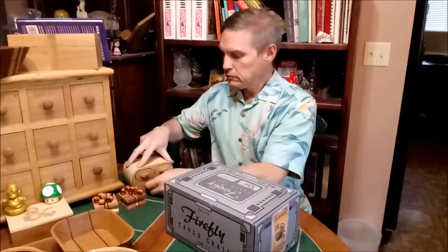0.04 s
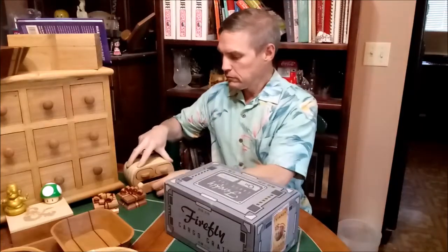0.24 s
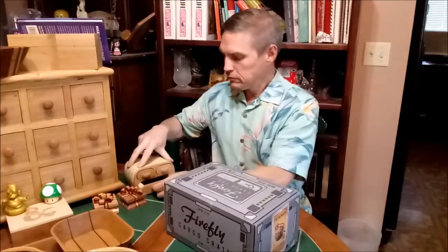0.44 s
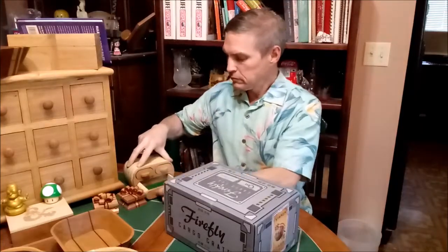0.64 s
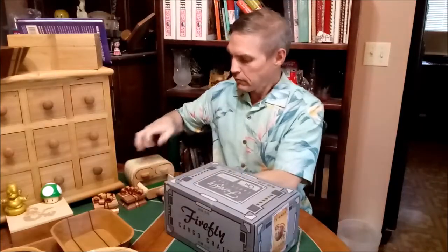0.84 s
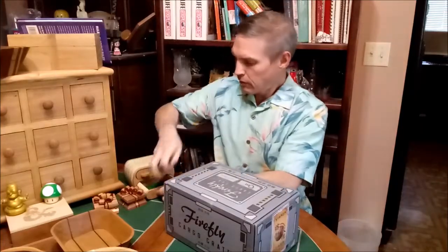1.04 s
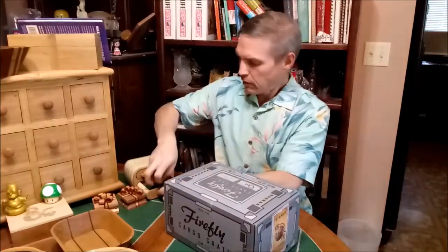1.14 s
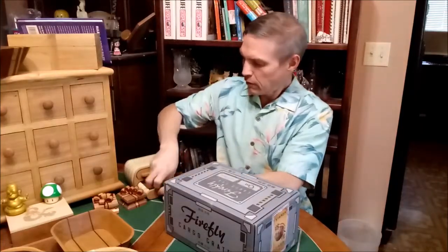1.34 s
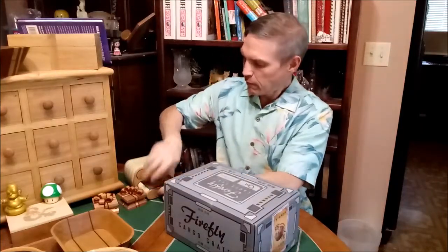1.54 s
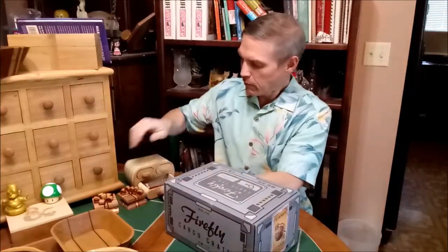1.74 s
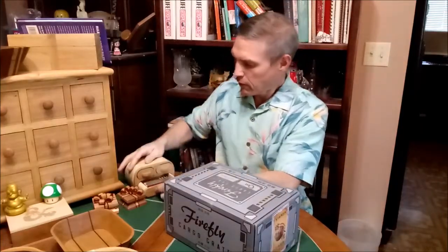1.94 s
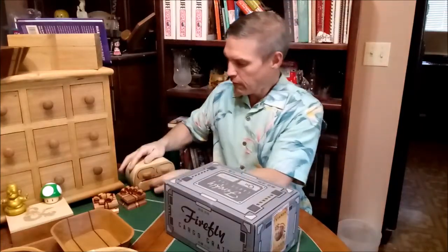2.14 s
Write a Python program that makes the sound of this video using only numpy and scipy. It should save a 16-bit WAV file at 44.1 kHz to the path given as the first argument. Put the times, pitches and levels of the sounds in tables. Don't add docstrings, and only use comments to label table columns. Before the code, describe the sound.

A small wooden box is slid on a tabletop, first with soft scrapes and faint bumps, then two bursts of sharp clacks and a last drag, close to the microphone in a furnished room with faint hiss.

```python
import sys
import numpy as np
from scipy import signal
from scipy.fft import rfft, irfft
from scipy.io import wavfile
from scipy.ndimage import uniform_filter1d

SR = 44100
rng = np.random.default_rng(int(sys.argv[2]) if len(sys.argv) > 2 else 0)


def field_ratio(decibels):
    return 10 ** (np.asarray(decibels, dtype=float) / 20)


def output_pcm(signal):
    pcm = np.clip(np.atleast_2d(signal).T, -1, 1) * 32767
    wavfile.write(sys.argv[1], SR, np.round(pcm).astype(np.int16))


N = 95961

# frequency in Hz, level in dB, t60 in seconds.
TABLE_MODES = [(151, -19, 0.081), (284, -14.5, 0.096), (351.6, -7, 0.051), (390.2, -2.5, 0.079),
               (440.5, 5.5, 0.045), (512.8, 3, 0.06), (596, -14, 0.11), (720, -3.5, 0.02)]
# frequency in Hz, level in dB, t60 in seconds.
WALL_MODES = [(660, 10.5, 0.016), (850, -4.5, 0.039), (963, 19, 0.0091), (1120, -33, 0.013)]
# frequency in Hz, level in dB, t60 in seconds.
DRAWER_MODES = [(1183, -12.5, 0.046), (1248, -6.5, 0.059), (1503.6, 2, 0.027), (1595, 5.5, 0.02),
                (1911, -3.5, 0.029), (2039, -17, 0.069)]
# frequency in Hz, level in dB, t60 in seconds.
EDGE_MODES = [(2570, -25, 0.017), (2660, 13, 0.0067), (2800, 12, 0.017), (2937, 14.5, 0.017),
              (2945, 10, 0.015), (3236, 12.5, 0.018), (3340, -14, 0.0058), (4100, -16, 0.0062)]
# frequency in Hz, level in dB, t60 in seconds.
CORNER_MODES = [(4143, 0, 0.0041), (4424, -6, 0.011), (4663, 2, 0.0092), (4830, -15, 0.02),
                (5415, -6, 0.014), (5760, -14, 0.02), (7280, -15.5, 0.0069), (7750, -22.5, 0.0065)]
# frequency in Hz, level in dB, t60 in seconds.
LEG_MODES = [(74.5, -13.5, 0.061), (115, -18.5, 0.098), (165, -12.5, 0.058)]

# frequency in Hz, level in dB per Hz.
AIR_SPECTRUM = [(18, -57), (30, -5), (161, -6.5), (194, -5), (287, -9.5), (1040, -6.5), (6050, -16),
                (10200, -14.5), (16000, -16.5)]
# start, rise and fall in seconds, level in dB.
SHUDDERS = [(.0, 0.031, 0.044, -65), (.11, 0.073, 0.038, -65), (.28, 0.018, 0.016, -76),
            (.47, 0.061, 0.073, -73), (.65, 0.022, 0.015, -74.5), (.88, 0.037, 0.021, -59.5),
            (1.325, 0.011, 0.11, -60), (1.42, 0.035, 0.039, -55), (1.52, 0.021, 0.079, -55),
            (1.68, .03, 0.014, -49.5), (1.73, 0.023, 0.095, -52), (2.04, 0.065, .06, -52)]
# peak and length in seconds, pitch in Hz, level in dB.
CATCHES = [(0.128, 0.034, 1116, -63.5), (0.129, 0.019, 724, -57), (0.122, 0.031, 218, -64.5),
           (0.26, 0.033, 1520, -66), (0.326, 0.031, 1637, -46), (0.337, 0.034, 1797, -56),
           (0.387, 0.012, 1640, -61), (0.325, .06, 8800, -73), (0.353, .04, 330, -54.5),
           (0.326, 0.029, 2300, -64), (0.326, 0.032, 3370, -52.5), (0.336, 0.043, 4100, -62.5),
           (0.296, 0.057, 5200, -75), (0.279, 0.047, 7360, -66), (0.47, 0.03, 5440, -70),
           (0.475, 0.03, 4520, -66.5), (0.485, 0.024, 1563, -57.5), (0.504, 0.048, 421, -53),
           (0.511, 0.029, 3340, -70), (.59, 0.025, 850, -68), (0.614, .03, 1470, -53.5),
           (0.652, 0.049, 3030, -50.5), (0.693, 0.026, 2920, -51), (0.629, 0.024, 4620, -57),
           (0.686, 0.021, 7500, -67), (0.736, 0.04, 1515, -51), (0.746, 0.04, 2010, -79),
           (0.791, 0.052, 1217, -62.5), (0.817, 0.065, 1520, -67), (0.833, 0.039, 370, -65),
           (0.96, 0.043, 520, -69.5), (1.346, 0.024, 3000, -50), (1.356, .025, 3930, -59),
           (1.339, 0.012, 531, -59.5), (0.908, .03, 1410, -64.5), (1.456, 0.038, 2786, -45),
           (1.441, 0.026, 1364, -38.5), (1.489, 0.057, 250, -57), (1.803, .04, 2340, -56.5),
           (1.476, 0.044, 2305, -57), (1.503, 0.028, 1415, -41), (1.558, 0.017, 3940, -58.5),
           (1.565, 0.011, 3000, -47), (1.728, 0.018, 1447, -32), (1.739, 0.016, 1627, -36),
           (1.767, 0.023, 2890, -46), (1.806, 0.035, 1633, -42.5), (1.847, 0.012, 383, -56),
           (2.027, 0.038, 456, -48.5), (2.074, 0.027, 370, -55), (2.1, 0.053, 8640, -73),
           (2.138, 0.019, 380, -47)]
# time in seconds, pitch in Hz, level in dB, t60 in seconds.
TAPS = [(.313, 1060, -67, 0.022), (.322, 536, -32, 0.063), (.329, 983, -36.5, 0.09), (.33, 540, -65, 0.036),
        (.349, 570, -50, 0.016), (.489, 850, -38.5, 0.067), (.88, 418, -48, 0.17), (.88, 505, -47, .05),
        (.885, 165, -55, 0.24), (.91, 260.5, -57.5, 0.095), (1.33, 80, -56, .05), (1.33, 174, -50.5, 0.037),
        (1.396, 513, -38.5, 0.037), (1.336, 8900, -50.5, 0.0054), (1.4, 8420, -53, 0.0051),
        (1.4005, 10440, -52.5, .005), (1.657, 10100, -49, .006), (1.692, 9370, -51.5, .008),
        (1.692, 8060, -51, .006), (1.336, 5460, -33.5, 0.008), (1.3995, 2420, -32, 0.019),
        (1.4, 1785, -16, 0.012), (1.4, 676, -44, 0.066), (1.49, 528, -40, 0.026), (1.525, 527, -43, 0.039),
        (1.65, 517, -29, 0.058), (1.687, 510, -37, 0.04), (1.735, 506, -37, 0.053),
        (1.657, 7100, -45, 0.0073), (1.69, 78.4, -59, 0.046), (1.691, 4380, -19, 0.004),
        (2.093, 2080, -41, 0.13), (2.12, 2070, -55, 0.054), (2.089, 522, -36, 0.024),
        (2.13, 378, -37, 0.063), (2.155, 277, -42.5, 0.037)]
# start, rise and fall in seconds, level in dB.
SLIDES = [
    (-.04, 0.033, 0.073, -69),
    (0.186, 0.13, 0.047, -40.5),
    (.44, 0.033, 0.048, -48.5),
    (0.562, 0.097, 0.1, -46),
    (1.331, 0.0061, 0.069, -45),
    (1.46, 0.053, 0.33, -57),
    (1.658, 0.048, 0.058, -35.5),
    (1.978, 0.096, 0.68, -46),
]
# table, walls, drawer, edges and corners in dB.
SLIDE_CONTACTS = [(-8, -11, -19, -17, -1), (-6.5, -6, -11, -13, -11.5), (-1, -3, -22, -17.5, -24.5),
                  (-18, -38, -2.5, -17, -10), (-14.5, -26.5, -18, -14, -10.5), (-4, -14, -19.5, -14, -10.5),
                  (-8, -12, -7, -5, -14), (-2, -15, 1, -6, -7)]
# time in seconds, peaks of drawer, table and walls in dB.
THUDS = [(.0594, -86, -58.5, -85), (.1136, -58, -50.5, -45), (.1984, -61, -54, -47),
         (.4904, -53, -60.5, -47), (.5223, -62, -56.5, -41), (.8801, -53, -52.5, -53),
         (1.6114, -33.5, -42.5, -74.5), (1.7443, -38.5, -41, -56), (2.0061, -43, -57, -83),
         (2.051, -48, -43, -65), (2.0904, -34, -34, -55), (2.1071, -61, -48, -36.5)]
# time in seconds, peaks of drawer, table, edges and corners in dB.
CLACKS = [(1.3204, -77, -90, -58, -52), (1.336, -75, -58.5, -37, -30), (1.3995, -16, -36.5, -18, -24),
          (1.4048, -26.5, -49.5, -53, -39), (1.4078, -29.5, -42, -49, -52.5),
          (1.4429, -28.5, -54.5, -39.5, -67), (1.6530, -34.5, -34.5, -39, -28.5),
          (1.6572, -19.5, -39, -21, -22.5), (1.6585, -16, -36, -41, -38.5), (1.6912, -32, -34.5, -49, -40),
          (1.6922, -14, -32.5, -24.5, -41)]

# band centre in Hz, t60 in seconds, share in dB.
ROOM_BANDS = [(124, 0.37, -17.5), (276, 0.36, -1.5), (704, 0.54, -3), (1646, 0.54, -1.5), (3000, 0.41, 2),
              (6000, 0.49, -5.5)]
# delay in seconds, level in dB.
ECHOES = [(.0045, -16), (.008, -14), (.013, -34)]
# time in seconds, lower edge in Hz, share lost from 0 to 1.
DROPOUTS = [(.157, 2780, 0.44), (.348, 6000, 0.69), (.84, 3000, 0.4), (.945, 2540, 0.4), (1.756, 6170, 0.8)]

RISE_CYCLES, SOFT_RISE_CYCLES = 1.8, 2.7


def unit(x):
    return x / np.sqrt(np.mean(x ** 2))


def through(x, h):
    return signal.fftconvolve(x, h)[:N]


def walk(rate_hz):
    hold = int(SR / rate_hz)
    steps = np.repeat(rng.standard_normal(N // hold + 1), hold)
    return unit(uniform_filter1d(steps, hold)[:N])


def ring(modes, rise_cycles=RISE_CYCLES):
    t = np.arange(SR // 2) / SR
    h = np.zeros(len(t))
    for hz, db, t60 in modes:
        build = 1 - np.exp(-(t * hz / rise_cycles) ** 2)
        decay = np.exp(-np.log(1000) * t / t60)
        h += field_ratio(db) * np.sin(2 * np.pi * hz * t) * build * decay
    return h / np.abs(h).max()


def grains():
    slips_per_s, spread_db, patchy_db, patch_hz = 6000, 3, 1.5, 71.27
    chance, side, size = rng.random((3, N))
    slipping = chance < slips_per_s / SR
    slips = slipping * np.sign(side - 0.5) * field_ratio(-spread_db * np.log(size + 0.0015))
    return unit(slips) * field_ratio(patchy_db * walk(patch_hz))


def stroke(start, rise, fall, db):
    t = np.arange(N) / SR - start
    swell = np.clip(t / rise, 0, 1) ** 2
    release = np.exp(-np.clip(t - rise, 0, 9) ** 2 / fall ** 2)
    return field_ratio(db) * swell * release


def rub(force, h):
    return through(force, h / np.sqrt(np.sum(h ** 2)))


def air_and_hiss():
    level_db, drift_db, drift_hz = -70, 0.63, 5.84
    dip_hz, dip_width_hz, dip_db = 6750, 1600, -8.5
    hz = np.maximum(np.fft.rfftfreq(N, 1 / SR), 1)
    corner_hz, corner_db = np.transpose(AIR_SPECTRUM)
    colour_db = np.interp(np.log(hz), np.log(corner_hz), corner_db)
    colour_db = colour_db + dip_db * np.exp(-((hz - dip_hz) / dip_width_hz) ** 2)
    noise = irfft(rfft(rng.standard_normal(N)) * field_ratio(colour_db), N)
    return field_ratio(level_db) * unit(noise) * field_ratio(drift_db * walk(drift_hz))


def frame_shudder():
    hum_hz, wobble, wobble_hz, rumble_db = 123, 0.0297, 20.2, -10.5
    press = sum(stroke(*row) for row in SHUDDERS)
    pitch_hz = hum_hz * (1 + wobble * walk(wobble_hz))
    hum = np.sin(2 * np.pi * np.cumsum(pitch_hz) / SR)
    rumble = rub(grains() * press, ring(LEG_MODES))
    return press * hum + field_ratio(rumble_db) * rumble


def catches():
    ring_cycles, longest_ring_s, longest_rise_s = 42, 0.035, 0.0025
    grain = grains()
    out = np.zeros(N)
    for peak, length, hz, db in CATCHES:
        t60 = min(ring_cycles / hz, longest_ring_s)
        rise_cycles = min(SOFT_RISE_CYCLES, hz * longest_rise_s)
        h = ring([(hz, 0, t60)], rise_cycles)[:SR // 8]
        out += rub(grain * stroke(peak - length, length, length, db), h)
    return out


def taps():
    out = np.zeros(N + SR)
    for time, hz, db, t60 in TAPS:
        i = int(time * SR)
        out[i:i + SR // 2] += field_ratio(db) * ring([(hz, 0, t60)])
    return out[:N]


def slides(parts):
    out = np.zeros(N)
    for k, h in enumerate(parts):
        pressure = sum(stroke(*row) * field_ratio(contact[k]) for row, contact in zip(SLIDES, SLIDE_CONTACTS))
        out += rub(grains() * pressure, h)
    return out


def knocks(table, parts):
    contact_s, gain_db = 0.00017, 3.5
    rows = np.array(table)
    push = np.exp(-0.5 * (np.arange(-60, 61) / SR / (contact_s / 4)) ** 2)
    push = push / push.sum()
    starts = (rows[:, 0] * SR).astype(int) - 70
    out = np.zeros(N)
    for h, peak_db in zip(parts, rows[:, 1:].T):
        force = np.zeros(N)
        force[starts] = field_ratio(peak_db + gain_db)
        out += through(force, np.convolve(h, push))
    return out


def room():
    tail_db, build_s = 0, 0.0046
    t = np.arange(SR) / SR
    tail = np.zeros(SR)
    for hz, t60, db in ROOM_BANDS:
        band_pass = signal.butter(2, [hz / 1.5, hz * 1.5], "band", fs=SR, output="sos")
        band = signal.sosfilt(band_pass, rng.standard_normal(SR))
        tail += field_ratio(db) * band * np.exp(-np.log(1000) * t / t60)
    h = field_ratio(tail_db) * tail * (1 - np.exp(-t / build_s)) * np.sqrt(20 / SR)
    for delay, db in ECHOES:
        h[int(delay * SR)] += field_ratio(db)
    h[0] = 1
    return h


def scene():
    mic_hz = 7130
    table, walls, drawer = ring(TABLE_MODES), ring(WALL_MODES), ring(DRAWER_MODES)
    edges, corners = ring(EDGE_MODES), ring(CORNER_MODES)
    soft_drawer, soft_walls = ring(DRAWER_MODES, SOFT_RISE_CYCLES), ring(WALL_MODES, SOFT_RISE_CYCLES)

    box = catches() + taps()
    box += slides([table, walls, drawer, edges, corners])
    box += knocks(THUDS, (soft_drawer, table, soft_walls))
    box += knocks(CLACKS, (drawer, table, edges, corners))

    mic = signal.butter(2, mic_hz, fs=SR, output="sos")
    heard = signal.sosfilt(mic, through(box, room()))
    return (air_and_hiss() + frame_shudder() + heard)[None]


def roll_off(x):
    return signal.sosfilt(signal.butter(12, 16510, fs=SR, output="sos"), x)


def record(dry):
    dropout_s, top_hz = 0.013, 15800
    t = np.arange(N) / SR
    for time, hz, share in DROPOUTS:
        high_pass = signal.butter(4, hz, "high", fs=SR, output="sos")
        treble = signal.sosfiltfilt(high_pass, dry)
        dry = dry - share * np.exp(-((t - time) / dropout_s) ** 4) * treble
    low_pass = signal.ellip(8, 0.2, 60, top_hz, fs=SR, output="sos")
    return roll_off(signal.sosfilt(low_pass, dry))


dry = scene()
out = record(dry)
output_pcm(out)
```